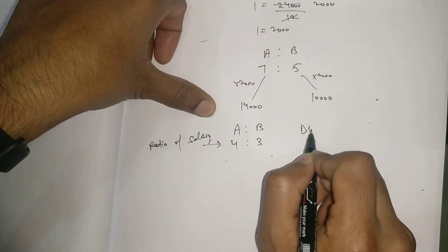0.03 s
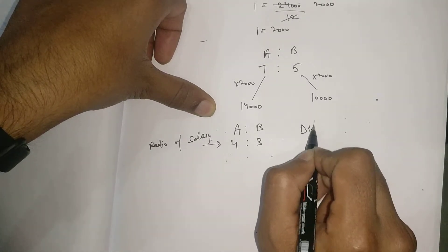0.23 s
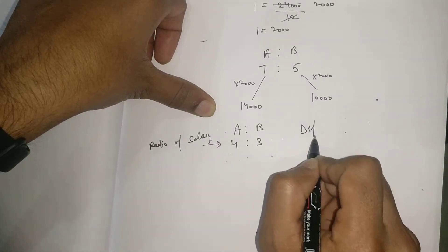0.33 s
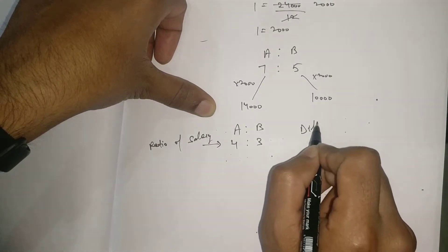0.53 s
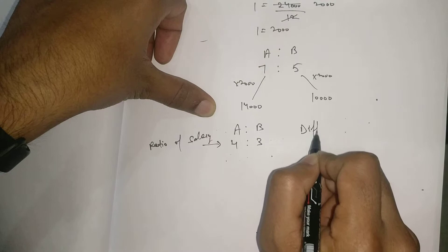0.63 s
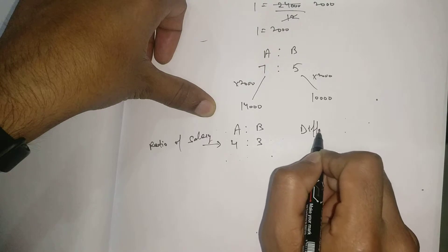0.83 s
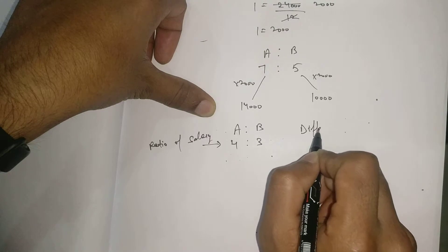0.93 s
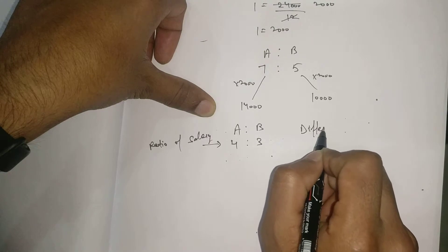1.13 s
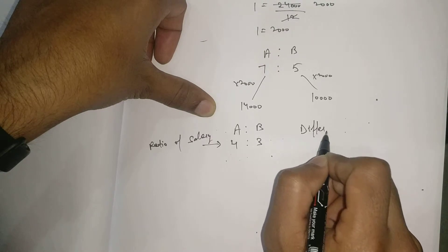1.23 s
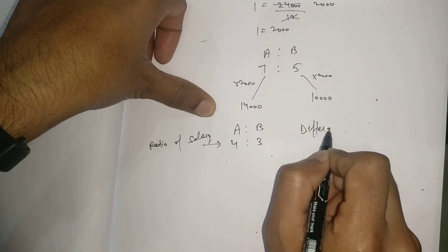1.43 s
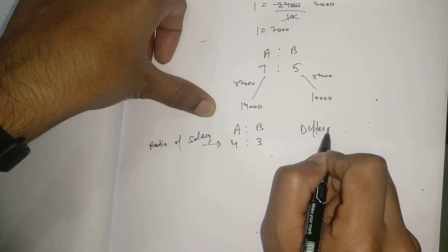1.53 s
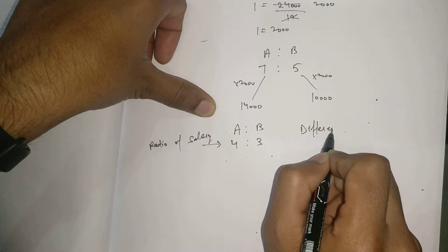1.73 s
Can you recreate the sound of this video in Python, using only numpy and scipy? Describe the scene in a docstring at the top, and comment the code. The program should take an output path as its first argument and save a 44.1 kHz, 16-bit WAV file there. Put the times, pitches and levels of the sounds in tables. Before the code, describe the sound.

A felt-tip pen writes small letters on paper, close up: brief, dry scratches run from 0 to 0.65 seconds, then from about 0.8 to 1.2, and lighter short ones from 1.35 to the end. Sharp little tip ticks come near 0.72 and 1.28. A far, deep rumble is fading at the start; muffled heavy thuds follow at 0.2 and 1.0, lingering over quiet room hush.

```python
"""A felt-tip pen writes small letters on paper close to a phone in a quiet room.
The rumble of a far, heavy blow is already dying away as the first stroke begins; two more blows follow.
Strokes are random slips filtered by resonances, with damped sines where the tip touches down.
Each blow repeats one long, low rumble: swelling tones and a brighter front over decaying diffuse noise.
Beneath it all lies the room's slowly drifting hush, a steady shaped noise."""
import sys
import numpy as np
from scipy import signal
from scipy.fft import rfft, irfft
from scipy.io import wavfile
from scipy.ndimage import uniform_filter1d

SR = 44100
rng = np.random.default_rng(int(sys.argv[2]) if len(sys.argv) > 2 else 0)


def store_wav(level_fs):
    """Save 16-bit WAV to argv[1]."""
    pcm = np.round(np.clip(np.atleast_2d(level_fs), -1, 1) * 32767)
    wavfile.write(sys.argv[1], SR, pcm.T.astype(np.int16))


def level_to_linear(level):
    """Convert decibel levels to linear amplitude factors, elementwise."""
    exponent = np.asarray(level, float) / 20
    return 10 ** exponent


N = 79380


def evened(x):
    """Normalisation to unit mean power (rms 1)."""
    return x / np.sqrt(np.mean(x ** 2) + 1e-20)


def read(points, hz):
    """Interpolation of a spectrum or decay curve on a logarithmic frequency axis."""
    f, value = np.transpose(points)
    return np.interp(np.log(hz + 1), np.log(f + 1), value)


def add(mix, s, sound):
    """Superposition: adds a sound to the mix at time s, which may be negative."""
    at = round(s * SR)
    sound = sound[:, max(-at, 0):]
    part = mix[:, max(at, 0):][:, :sound.shape[1]]
    part += sound[:, :part.shape[1]]


def pan(db):
    """Interchannel level difference: gains for left minus right in dB."""
    return level_to_linear(np.array([[db / 2], [-db / 2]]))


def noise(spectrum, same, t60=None, size=1024):
    """Partly coherent Gaussian noise in two channels; with t60, each band decays exponentially."""
    frames, hz = 4 * N // size + 5, np.fft.rfftfreq(size, 1 / SR)
    a, b, c, d = rng.standard_normal((frames, len(hz), 4)).T
    left, other = a + 1j * b, c + 1j * d
    like = np.clip(read(same, hz), -1, 1)[:, None]
    right = like * left + np.sqrt(1 - like ** 2) * other
    gain = level_to_linear(read(spectrum, hz))
    z = np.array([left, right]) * gain[:, None]
    norm = np.sqrt(np.mean(gain ** 2) * 4 / 3 * size)
    if t60 is not None:
        frame_s = np.arange(frames) * size / 4 / SR
        z = z * level_to_linear(-60 * frame_s / read(t60, hz)[:, None])
    return signal.istft(z, nperseg=size, noverlap=3 * size // 4)[1][:, :N] / norm


def slips_at_ports(hz):
    """Stick-slip friction as random impulses: their spectra at two partly coherent microphone ports."""
    # likeness of the two ports: (frequency [Hz], likeness [0..1])
    port_same = [(1000, 0.19), (2000, 0.99), (2700, 1), (4800, 0.63), (5700, 1), (7000, 1), (9000, 0.55)]
    # phase by which the left port leads: (frequency [Hz], phase [rad])
    port_turn = [(4800, 0.047), (5600, 1), (6300, 1.56), (7000, 2.3)]
    slips_per_s, slip_spread_db = 9000, 2.5
    sizes = level_to_linear(slip_spread_db * rng.exponential(1, (2, N)))
    signs = rng.choice([-1., 1.], (2, N))
    happens = rng.random((2, N)) < slips_per_s / SR
    left, other = rfft(sizes * signs * happens)
    like = np.clip(read(port_same, hz), 0, 1)
    right = like * left * np.exp(-1j * read(port_turn, hz)) + np.sqrt(1 - like ** 2) * other
    return np.array([left, right])


def pen():
    """Source and filter: dense slips excite the sheet's resonances; a fine hiss is mostly at the left."""
    # pen strokes: (start [s], length [s], level [dB], change over the stroke [dB], tilt [dB per octave],
    # mid hump [dB], fine hiss level [dB])
    strokes = [(0.029, 0.11, -62, 3, 2, 0, -62), (0.165, 0.12, -64, -4.5, -1, -1.5, -63),
               (0.355, 0.019, -57.5, 2, -2, -11, -83), (0.383, 0.13, -62.5, 2.5, 2.5, -1, -62),
               (0.536, 0.094, -64.5, -0.5, 1, 1, -63.5), (0.777, 0.075, -65, -0.5, -1.5, 5, -72),
               (0.86, 0.11, -70, -8, 0, 4.5, -74.5), (0.953, 0.091, -64.5, 1.5, -0.5, 2, -66),
               (1.096, 0.078, -66.5, 15.5, -2, -0.5, -68.5), (1.345, 0.069, -67, 3, -3, 6, -79),
               (1.435, 0.071, -69.5, -13, -0.5, 7, -72.5), (1.49, 0.058, -72.5, -3, -4.5, 1, -78),
               (1.525, .07, -66, 7, 1.5, 6.5, -71), (1.657, 0.032, -71.5, 0, 0, 2, -90),
               (1.735, 0.025, -63.5, -1, 2, 10, -78), (1.787, .04, -67, 7, 2, 1, -67)]
    # resonances of pen and sheet under the tip: (frequency [Hz], width at half amplitude [Hz], level [dB])
    sheet = [(1590, 1100, -1), (2375, 860, 3.5), (3110, 330, 1.5), (3605, 850, 2.5), (4540, 1900, -2.5),
             (5480, 1300, 2.5), (6480, 650, -8.5), (5470, 73, 1)]
    # spectrum of the felt's fine hiss: (frequency [Hz], relative density [dB per Hz])
    felt_spectrum = [(6000, -55), (7500, -17.5), (9000, -15.5), (10500, -4), (12500, -4.5), (14200, -3),
                     (16000, -8)]
    rise_s, fall_s = 0.015, 0.026
    spot_spread_db = 1.2  # each spot of the sheet rings a little differently
    wobble_db = 0.67
    hump_hz, hump_width_hz = 3230, 650
    hiss_power = 1.45  # the fine hiss grows faster than the pressure

    hz = np.fft.rfftfreq(N, 1 / SR)
    ports = slips_at_ports(hz)
    felt = evened(irfft(ports * level_to_linear(read(felt_spectrum, hz)), N) * pan(24.5))
    wobble = level_to_linear(wobble_db * evened(uniform_filter1d(rng.standard_normal(N), 500)))
    spots_db = spot_spread_db * rng.standard_normal((len(strokes), len(sheet)))
    t, out = np.arange(N) / SR, np.zeros((2, N))
    for stroke, spot_db in zip(strokes, spots_db):
        start, length, db, change_db, tilt_db, hump_db, hiss_db = stroke
        u = t - start
        press = np.clip(np.minimum(u / rise_s, (length - u) / fall_s), 0, 1)
        press = press * level_to_linear(change_db * (u / length - .5).clip(-1, 1))
        power = 0
        for (f, width, g), d in zip(sheet, spot_db):
            peak = level_to_linear(g + d + tilt_db * np.log2(f / 3300))
            power = power + peak ** 2 / (1 + (2 * (hz - f) / width) ** 2) ** 2
        hump = level_to_linear(hump_db * np.exp(-((hz - hump_hz) / hump_width_hz) ** 2))
        body = evened(irfft(ports * hump * np.sqrt(power), N))
        scrape = level_to_linear(db) * pan(1) * press * body
        hiss = level_to_linear(hiss_db) * press ** hiss_power * felt
        out += wobble * (scrape + hiss)
    return out


def taps():
    """Modal ringing: the tip ticks on the desk as a sum of exponentially damped sines."""
    # tip touching down: (time [s], level [dB])
    touches = [(0.036, -63), (0.1668, -60), (0.7219, -54), (0.726, -62), (.7297, -62), (.7322, -63.5),
               (1.277, -54), (1.2963, -56), (1.4398, -68)]
    # modes a tap rings: (frequency [Hz], level relative to the tap [dB], t60 [s])
    barrel = [(1510, -12, 0.0075), (2404, -1, 0.0076), (3350, -8, 0.0052), (4263, -0.5, 0.0039),
              (4978, 1.5, 0.0053), (6280, -28, 0.0045)]
    t, out = np.arange(900) / SR, np.zeros((2, N))
    for s, db in touches:
        detune = rng.uniform(0.96, 1.05, len(barrel))
        tick = 0
        for k, (hz, g, t60) in zip(detune, barrel):
            tick = tick + level_to_linear(g - 60 * t / t60) * np.sin(2 * np.pi * hz * k * t)
        add(out, s, level_to_linear(db) * tick * np.ones((2, 1)))
    return out


def swells():
    """Staggered wave packets: low sines under sin-squared envelopes, with phase scatter between channels."""
    # tones of one rumble: (delay [s], length [s], frequency [Hz], level relative to the blow [dB])
    tones = [(0.00067, 0.17, 60, -33.5), (0.012, 0.072, 310, -45.5), (0.0088, 0.032, 206.4, -36),
             (0.0058, 0.1, 235, -41), (0.076, 0.081, 123, -35.5), (0.021, 0.07, 98, -35),
             (0.016, 0.077, 153, -33), (0.052, 0.087, 225, -41), (0.068, 0.12, 86, -38),
             (.07, 0.2073, 153.6, -35.5), (0.11, .13, 228, -44), (0.085, 0.15, 110, -37.5),
             (0.094, 0.29, 57, -41), (0.17, 0.089, 87, -42), (0.189, 0.098, 94, -38.5),
             (0.28, 0.17, 78, -42.5), (0.3, 0.21, 110, -48), (0.38, 0.15, 58, -43.5), (0.51, 0.22, 56, -50),
             (0.46, .12, 76, -47), (0.32, 0.11, 150, -54.5), (0.32, 0.091, 150, -54.5),
             (0.26, 0.082, 245, -54.5), (0.8, 0.11, 66.4, -51), (0.648, 0.13, 58, -52)]
    early_db, main_s, main_rise_s = -6, 0.031, 0.0032  # a weak forerunner precedes the main wave
    scatter = .06  # full range of left-right phase, cycles per 100 Hz
    t, out = np.arange(N) / SR, np.zeros((2, N))
    main = level_to_linear(early_db * (1 - np.clip((t - main_s) / main_rise_s, 0, 1)))
    for (delay, length, hz, db), (a, b) in zip(tones, rng.random((len(tones), 2))):
        swell = np.sin(np.pi * np.clip((t - delay) / length, 0, 1)) ** 2
        turn = scatter * (b - .5) * hz / 100
        cycles = hz * t + a + np.array([[0], [turn]])
        out += level_to_linear(db) * main * swell * np.sin(2 * np.pi * cycles)
    return out


def pounding():
    """Reverberant decay: swells and a brighter front over diffuse echoes, one rumble for every blow."""
    # distant blows, the first before the start: (time [s], level [dB])
    blows = [(-0.57, -0.5), (.18, 1.5), (1.0273, 0)]
    # spectrum of the diffuse echoes before decay: (frequency [Hz], relative density [dB per Hz])
    echoes = [(30, -55), (55, -29), (150, -6.5), (300, -13.5), (400, -27), (700, -29), (1400, -36.5),
              (2000, -72)]
    # decay of the echoes: (frequency [Hz], t60 [s])
    echo_t60 = [(50, 0.9), (130, 2.38), (300, 1.05), (500, 0.81), (1500, 0.94)]
    # spectrum of the short brighter front: (frequency [Hz], relative density [dB per Hz])
    front_spectrum = [(150, -23), (300, -6.5), (500, -4), (900, -11), (1500, -14), (2000, -43)]
    # left-right likeness of the far sound: (frequency [Hz], likeness [-1..1])
    far_same = [(60, .995), (240, 0.89), (480, 0.77), (950, 0.17)]
    echo_db, echo_rise_s = -38.5, 0.021
    front_db, front_rise_s, front_t60 = -50.5, 0.035, 0.19

    t = np.arange(N) / SR
    tail = noise(echoes, far_same, echo_t60, size=2048)
    rumble = level_to_linear(echo_db) * tail * np.minimum(t / echo_rise_s, 1)
    front = level_to_linear(front_db - 60 * t / front_t60) * np.minimum(t / front_rise_s, 1)
    rumble = rumble + front * evened(noise(front_spectrum, far_same)) + swells()
    out = np.zeros((2, N))
    for s, db in blows:
        add(out, s, level_to_linear(db) * rumble)
    return out * pan(-0.26)


def hush():
    """Stationary background: spectrally shaped, partly coherent noise under a slow level drift."""
    # spectrum of the hush: (frequency [Hz], relative density [dB per Hz])
    hush_spectrum = [(30, -16.5), (60, -6), (150, -9), (350, -34.5), (900, -36), (1700, -37.5),
                     (2500, -35.5), (3600, -40.5), (5700, -40.5), (6500, -53), (8000, -51), (10000, -47.5),
                     (14700, -40.5), (15900, -42.5)]
    # left-right likeness of the hush: (frequency [Hz], likeness [-1..1])
    room_same = [(60, 0.86), (180, 0.96), (550, 0.23), (1650, -0.025), (4970, -0.16), (15000, 0.057)]
    level_db, drift_db = -57, 0.5
    drift = level_to_linear(drift_db * evened(uniform_filter1d(rng.standard_normal(N), 4000)))
    return level_to_linear(level_db) * drift * evened(noise(hush_spectrum, room_same, size=2048))


def scene():
    """Linear superposition of pen, taps, far pounding and the room's hush."""
    return pen() + taps() + pounding() + hush()


def low_pass(x):
    """Removes everything above the highest recorded frequency."""
    return signal.sosfilt(signal.butter(12, 16170, fs=SR, output="sos"), x)


def record(dry):
    """High-pass response and compression: the microphone loses deep bass, gain ducks under the rumble."""
    low_hz = 42.6
    knee_db, duck_db_per_db, recover_db_per_s = -43, 0.13, 44
    x = signal.sosfilt(signal.butter(6, low_hz, "high", fs=SR, output="sos"), dry)
    power = uniform_filter1d((x ** 2).mean(0), 1500)
    power_db = 10 * np.log10(abs(power) + 1e-12)
    # peak hold that falls back at a constant rate in dB
    fall = np.arange(N) * recover_db_per_s / SR
    held_db = np.maximum.accumulate(power_db + fall) - fall
    over_db = np.maximum(held_db - knee_db, 0)
    mix = x / level_to_linear(duck_db_per_db * uniform_filter1d(over_db, 600))
    return low_pass(mix)


dry = scene()
out = record(dry)
store_wav(out)
```